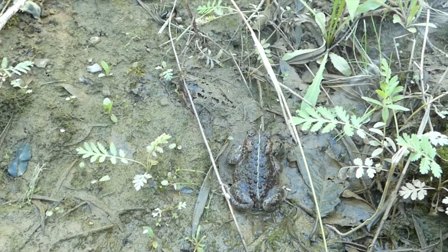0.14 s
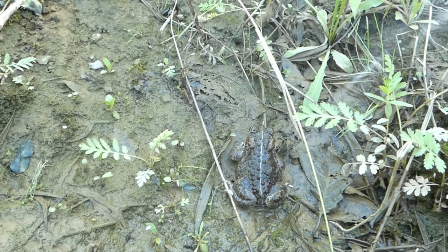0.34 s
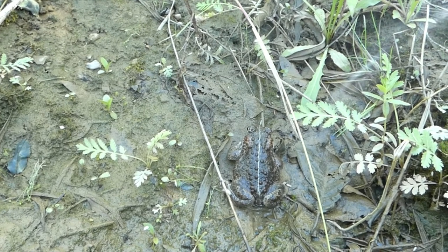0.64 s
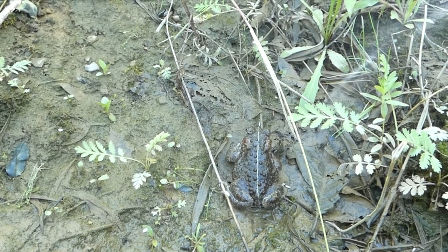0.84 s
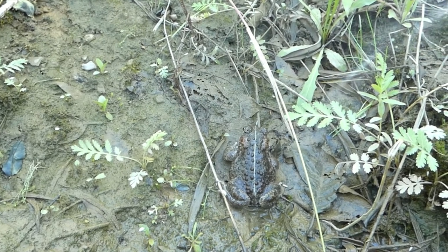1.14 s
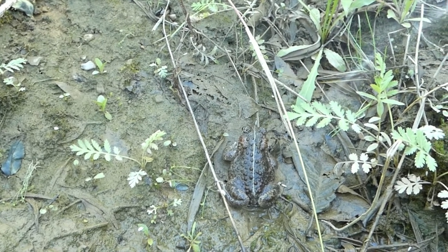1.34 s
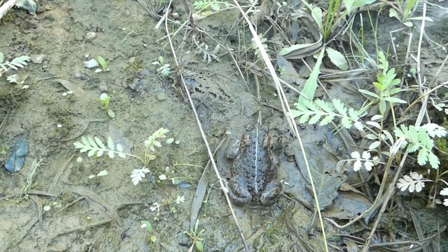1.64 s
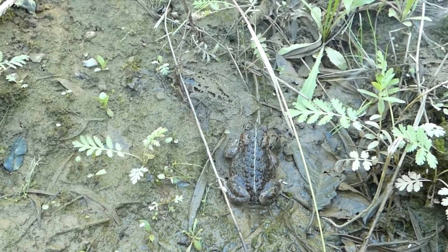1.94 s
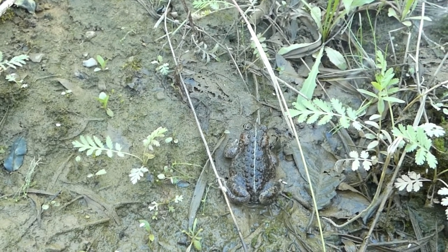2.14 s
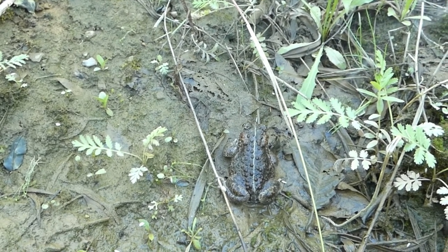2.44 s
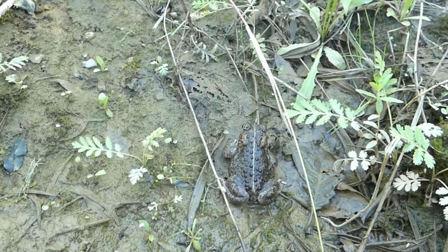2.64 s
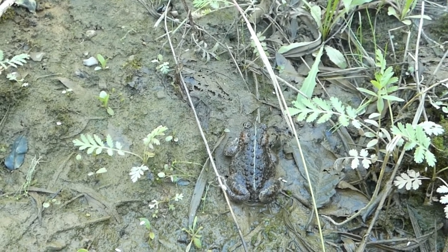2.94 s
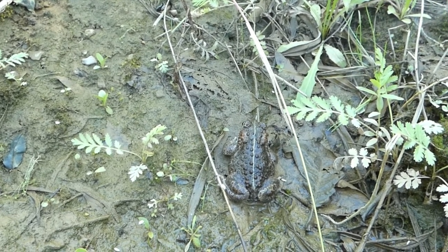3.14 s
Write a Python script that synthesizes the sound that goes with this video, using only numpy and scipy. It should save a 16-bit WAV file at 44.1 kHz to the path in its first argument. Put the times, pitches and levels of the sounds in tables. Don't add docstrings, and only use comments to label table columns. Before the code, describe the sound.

Rattling toad calls trill almost continuously over a blurred far chorus and soft leaf hiss

```python
import sys
import numpy as np
from scipy import signal
from scipy.fft import rfft, irfft
from scipy.io import wavfile
from scipy.ndimage import uniform_filter1d

SR = 44100
rng = np.random.default_rng(int(sys.argv[2]) if len(sys.argv) > 2 else 0)


def file_out(sig):
    cols = np.atleast_2d(sig).T
    lim = np.clip(cols, -1, 1)
    pcm = np.round(lim * 32767).astype(np.int16)
    wavfile.write(sys.argv[1], SR, pcm)


def field_ratio(decibels):
    return 10 ** (np.asarray(decibels, dtype=float) / 20)


N = 145530


def level(x, db):
    return x * field_ratio(db) / np.sqrt(np.mean(x ** 2))


def walk(rate):
    hold = int(SR / rate)
    steps = np.repeat(rng.standard_normal(N // hold + 1), hold)
    smooth = uniform_filter1d(uniform_filter1d(steps, hold), hold)
    return 0.83 * smooth[:N]


def pan(db):
    return field_ratio(np.array([[db], [-db]]) / 2)


def tail(t60):
    shared = 0.61
    t = np.arange(SR // 2) / SR
    fade = np.exp(-np.log(1000) * t / t60)
    build_up = np.clip(t / 0.016, 0, 1)
    h = rng.standard_normal((2, len(t))) * fade * build_up
    h = shared * h[0] + (1 - shared) * h
    return h / np.sqrt(np.sum(h ** 2, axis=1, keepdims=True))


def echo(x, h):
    return signal.fftconvolve(x, h, axes=1)[:, :N]


def air(colour, db, swell_db, flicker_db, gust_db, octaves):
    # (frequency [Hz], likeness [0-1])
    likeness = [(40, 0.4), (130, 0.6), (290, 0.49), (640, 0), (1400, 0.8), (3000, 0.75), (6000, 0.87),
                (12000, 0.39)]
    f = np.arange(N // 2 + 1) * SR / N + 1

    def read(table):
        hz, value = np.array(table).T
        return np.interp(np.log(f), np.log(hz), value)

    like = read(likeness).clip(0, 1)
    lowest, highest = np.array(colour)[[0, -1], 0]
    shape = field_ratio(read(colour)) / (1 + (lowest / f) ** 2 + (f / highest) ** 4)
    noise = rfft(rng.standard_normal((2, N)))
    mid, side = noise * shape * np.sqrt([1 + like, 1 - like])
    both = np.array([mid + side, mid - side])
    swell = walk(4)
    out = 0
    for octave in octaves:
        band = np.cos(np.pi * (np.log2(f) - octave).clip(-1, 1) / 2) ** 2
        gust = gust_db * np.clip(octave - 12, 0, 1)
        out = out + irfft(both * band, N) * field_ratio(swell_db * swell + flicker_db * walk(11) + gust)
    return level(out, db)


def traffic():
    # (frequency [Hz], level [dB per Hz])
    rumble_colour = [(20, -30), (45, -20.5), (110, -5), (260, 0), (350, -5), (650, -6.5), (2400, -7.5)]
    return air(rumble_colour, -51.5, swell_db=0.11, flicker_db=0.65, gust_db=0, octaves=range(5, 12))


def leaves():
    # (frequency [Hz], level [dB per Hz])
    hiss_colour = [(900, 1), (2300, -3), (3200, -0.5), (5500, -1), (8000, -8.5), (9800, -9.5), (12000, -19),
                   (15000, -30.5)]
    # (time [s], level [dB])
    breeze_points = [
        (0.0, -63),
        (0.3, -63.5),
        (1.8, -61),
        (3.3, -62),
    ]
    breeze = np.interp(np.arange(N) / SR, *np.array(breeze_points).T)
    gust = breeze - breeze.mean()
    hiss = air(hiss_colour, -49.5, swell_db=1.53, flicker_db=1.02, gust_db=gust, octaves=range(10, 15))
    return hiss * pan(1.5)


def toad(pulses, voice):
    hz, detune, rise, sag, ring_db, t60, over_db, gain_db, pan_db, lead = voice
    pause, climb = 0.06, 0.036
    s, db = np.array(pulses).T

    ms = np.arange(SR // 40) / SR * 1000
    burst = (ms / rise) ** 3 * np.exp(3 - 3 * ms / rise)
    ring_fade = np.exp(-np.log(1000) * ms / 1000 / t60)
    ring = field_ratio(ring_db) * (1 - np.exp(-(ms / rise) ** 2)) * ring_fade

    call_start = np.where(np.diff(s, prepend=-1) > pause, s, 0)
    opened = np.maximum.accumulate(call_start)
    scatter, turn = rng.standard_normal((2, len(s)))
    turn = turn[:, None]
    pitch = hz * (1 + detune * scatter + climb * (s - opened).clip(0, .3))
    cycles = np.cumsum(1 - sag * np.exp(-ms / rise)) / SR
    phase = 2 * np.pi * np.outer(pitch, cycles) + turn
    over = 2 * np.pi * 1.85 * hz * ms / 1000 + 2 * turn
    tone = np.exp(1j * phase) + field_ratio(over_db) * np.exp(1j * over)
    wave = field_ratio(db + gain_db)[:, None] * (burst + ring) * tone

    start = ((s - rise / 1000) * SR).astype(int).clip(0, N)
    at = (start[:, None] + np.arange(len(ms))).ravel()
    out = []
    for side in (1, -1):
        heard = (wave * np.exp(1j * side * lead / 2)).imag
        out.append(np.bincount(at, heard.ravel(), N + SR)[:N])
    return np.array(out) * pan(pan_db)


def chorus(count=8):
    far_voice = (0.09, 2.5, 0.2574, -35, -3, -19.5, 0, 7, -0.45)
    jitter_ms, scatter_db = 1.1, 2
    out = 0
    for beat, loudness, pitch in rng.standard_normal((count, 3)):
        first = rng.random() * .55 - .3
        calls = first + (.55 + .02 * beat) * np.arange(7)[:, None]
        s = (calls + np.linspace(0, .33, 21)).ravel()
        early, strong = rng.standard_normal((2, s.size))
        pulses = np.array([s + jitter_ms * early / 1000, 2 * loudness + scatter_db * strong]).T
        hz = 1769 + 70.5 * pitch
        out = out + toad(pulses[pulses[:, 0] > .004], (hz, *far_voice))
    return level(out + echo(out, tail(0.46)), -46.5)


def deep_toad():
    # (time [s], level [dB])
    early_pulses = [(0.0021, -37), (0.0193, -38), (0.0413, -35), (0.0615, -42), (0.0898, -34.5),
                    (0.1057, -34.5), (0.1296, -34), (0.1495, -31.5), (0.1768, -38), (0.2068, -32),
                    (0.224, -43), (0.244, -32), (0.2694, -36), (0.2927, -33), (0.3098, -30.5),
                    (0.8154, -34), (0.85, -38), (0.8751, -43), (0.8948, -33), (0.9221, -32.5),
                    (0.9734, -29), (0.9864, -33), (1.0168, -36), (1.0403, -34.5), (1.0707, -36),
                    (1.0962, -33), (1.1193, -36), (1.1472, -32.5), (1.1652, -32.5), (1.185, -33),
                    (1.2046, -30.5), (1.4668, -35), (1.5107, -32.5), (1.5368, -37.5)]
    # (time [s], level [dB])
    late_pulses = [(1.8698, -33), (1.8953, -33), (1.92, -34.5), (1.9513, -34), (1.9715, -36), (1.996, -33),
                   (2.0226, -33), (2.0539, -32), (2.0718, -35), (2.0885, -31), (2.1041, -38), (2.1164, -35),
                   (2.136, -33), (2.1497, -34), (2.1708, -32.5), (2.6045, -31), (2.631, -36), (2.6546, -35),
                   (2.6726, -35), (2.692, -35.5), (2.711, -37), (2.73, -33.5), (2.7551, -33),
                   (2.7732, -31.5), (2.7992, -35), (2.816, -32), (2.8332, -36), (2.857, -31.5),
                   (2.8792, -33), (2.898, -33.5), (2.928, -32.5), (3.1137, -40), (3.1624, -36),
                   (3.176, -37), (3.1992, -42), (3.2194, -39), (3.2509, -38), (3.2847, -35)]
    deep_voice = (1377.5, 0.02, 3, -0.0141, -12, 0.25, -48, -1.5, 5, 0.47)
    return toad(np.concatenate([early_pulses, late_pulses]), deep_voice)


def high_toad():
    # (time [s], level [dB])
    early_pulses = [(0.0053, -32), (0.0256, -30), (0.0512, -41), (0.0675, -32.5), (0.2728, -46),
                    (0.3825, -28), (0.4183, -34), (0.4344, -31), (0.451, -31), (0.4664, -32), (0.4835, -34),
                    (0.5138, -27.5), (0.5313, -42), (0.5466, -34), (0.5604, -40), (0.5749, -32),
                    (0.5939, -35), (0.8059, -36), (0.9751, -28), (0.9897, -29), (1.006, -29.5),
                    (1.0205, -34), (1.0345, -28), (1.0492, -42), (1.0633, -38), (1.078, -27), (1.0898, -30),
                    (1.1041, -34), (1.1207, -38), (1.132, -33.5), (1.1451, -31), (1.1604, -40)]
    # (time [s], level [dB])
    late_pulses = [(1.4003, -33), (1.456, -30), (1.5247, -31), (1.5416, -31), (1.5573, -32), (1.5747, -39),
                   (1.5912, -33), (1.605, -36), (1.622, -43), (1.6358, -31.5), (1.6496, -36),
                   (1.6616, -32.5), (1.6754, -35), (1.686, -33), (1.703, -34.5), (1.7178, -32.5),
                   (1.9799, -30), (2.0465, -33), (2.0613, -30), (2.098, -30), (2.1232, -28.5),
                   (2.1355, -33), (2.1518, -30), (2.1668, -33), (2.1843, -37), (2.5685, -30),
                   (2.5823, -28.5), (2.6, -34), (2.6283, -31), (2.659, -31), (2.694, -36), (2.9877, -33),
                   (3.021, -35), (3.1, -31), (3.1224, -33.5), (3.1404, -33), (3.1571, -31.5), (3.171, -35),
                   (3.1854, -43), (3.2012, -30), (3.2629, -40)]
    high_voice = (1757, 0.0838, 2, 0.3, -10, 2.8, -24.5, -3.5, 5.5, 0.5)
    return toad(np.concatenate([early_pulses, late_pulses]), high_voice)


def near_toad():
    # (time [s], level [dB])
    near_pulses = [(0.0931, -30), (0.1071, -38), (0.121, -30), (0.1348, -35), (0.1462, -27.5),
                   (0.1572, -29), (0.1691, -39), (0.1847, -29), (0.2022, -31), (0.2167, -27),
                   (0.2322, -34), (0.2528, -26), (0.268, -31), (0.2828, -30), (0.2972, -31), (0.3154, -28),
                   (0.3292, -26), (0.345, -26.5), (0.362, -27), (0.3766, -27), (0.3909, -33),
                   (0.4039, -26), (0.425, -30.5), (0.6195, -35), (0.6344, -30.5), (0.6486, -30.5),
                   (0.6659, -30), (0.68, -26.5), (0.693, -29.5), (0.7078, -34), (0.7275, -27),
                   (0.7416, -32), (0.7542, -30), (0.7688, -28), (0.7855, -41), (0.8015, -29),
                   (0.8168, -31.5), (0.8301, -32), (0.845, -27.5), (0.8607, -29), (0.8772, -28.5),
                   (0.8906, -29), (0.9056, -28.5), (0.9237, -28.5), (0.9355, -26), (0.9491, -27.5),
                   (0.9607, -29),
                   (1.177, -31), (1.193, -35), (1.2071, -33), (1.2207, -33), (1.232, -32), (1.2417, -28),
                     (1.253, -29), (1.2658, -33), (1.286, -28.5), (1.2975, -30.5), (1.3124, -29),
                     (1.3303, -30), (1.3458, -31), (1.3598, -27.5), (1.3748, -27.5), (1.3915, -31),
                     (1.407, -28), (1.4244, -27.5), (1.4348, -32), (1.4498, -26.5), (1.4677, -28.5),
                     (1.484, -28.5), (1.4951, -34), (1.512, -34.5), (1.5294, -34), (1.7335, -30),
                     (1.747, -31), (1.7618, -31), (1.7797, -29), (1.791, -27.5), (1.8044, -30),
                     (1.8183, -31.5), (1.8338, -33), (1.8514, -31), (1.8652, -27.5), (1.879, -27),
                     (1.8934, -32), (1.9095, -29.5), (1.926, -31.5), (1.9406, -30.5), (1.9552, -28),
                     (1.9685, -30), (1.9854, -28), (1.9988, -28.5), (2.0132, -31), (2.0272, -31),
                     (2.0428, -28), (2.055, -28.5), (2.0696, -29), (2.0792, -36), (2.0915, -40),
                     (2.1082, -30),
                   (2.2777, -31.5), (2.2914, -31), (2.3055, -29.5), (2.3207, -31.5), (2.3363, -28),
                    (2.3498, -28), (2.3613, -27.5), (2.381, -28.5), (2.3973, -26.5), (2.4109, -27.5),
                    (2.4247, -32), (2.4409, -27.5), (2.458, -27), (2.4722, -26.5), (2.4845, -27),
                    (2.4994, -26), (2.5134, -24.5), (2.5313, -25.5), (2.5462, -26.5), (2.5558, -26),
                    (2.5681, -30), (2.5881, -30.5), (2.7823, -33.5), (2.796, -29.5), (2.8105, -31.5),
                    (2.8272, -30.5), (2.8443, -29.5), (2.8602, -41), (2.8783, -30.5), (2.8964, -30),
                    (2.9103, -29.5), (2.9244, -29), (2.9372, -30.5), (2.9548, -28), (2.9702, -30),
                    (2.9819, -29.5), (2.998, -30.5), (3.0125, -30), (3.0295, -26), (3.0412, -28),
                    (3.0541, -27.5), (3.0675, -24.5), (3.0855, -30.5)]
    near_voice = (1650, .004, 2.8, 0.13, -8, 0.09, -21, -3.3, 7.5, 0.43)
    return toad(np.array(near_pulses), near_voice)


def pond(toads):
    return toads + field_ratio(-11.5) * echo(toads, tail(0.14))


def bird():
    # (time [s], length [s], end pitch [Hz], drop [Hz], level [dB])
    whistles = [
        (0.175, 0.068, 3950, 515, -46),
        (0.244, .035, 3540, 425, -50),
        (0.491, 0.054, 5250, 353, -45),
        (0.535, 0.051, 3570, 1005, -49.5),
        (.832, 0.079, 4450, 60, -48.5),
        (0.877, 0.052, 3720, 850, -52),
        (1.14, 0.031, 5270, 150, -47),
        (1.172, 0.054, 3540, 994, -50),
    ]
    out = np.zeros(N)
    wobble = walk(150)
    for s, length, hz, drop, db in whistles:
        u = np.linspace(0, 1, int(length * SR))
        n = len(u)
        pitch = hz + drop * (1 - u) ** 2.6 + 60 * wobble[:n]
        tone = np.sin(2 * np.pi * np.cumsum(pitch) / SR)
        swell = np.sin(np.pi * u ** 0.94)
        start = int(s * SR)
        out[start:start + n] += field_ratio(db) * swell * tone * field_ratio(3.5 * wobble[-n:])
        wobble = np.roll(wobble, n)
    out = out * pan(3.2)
    return out + field_ratio(-3) * echo(out, tail(.44))


def scene():
    background = traffic() + leaves() + chorus()
    toads = deep_toad() + high_toad() + near_toad()
    return background + pond(toads) + bird()


def top_cut(x):
    return signal.sosfilt(signal.butter(12, 15490, fs=SR, output="sos"), x)


def record(dry):
    low_pass = signal.ellip(8, .2, 60, 15080, fs=SR, output="sos")
    mix = signal.sosfilt(low_pass, dry)
    return top_cut(mix)


dry = scene()
out = record(dry)
file_out(out)
```